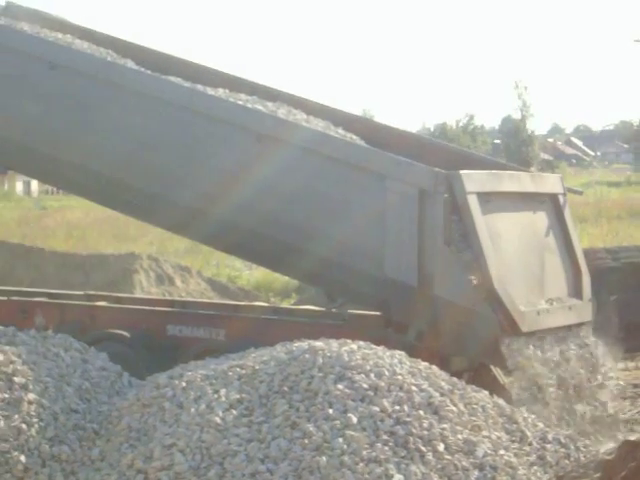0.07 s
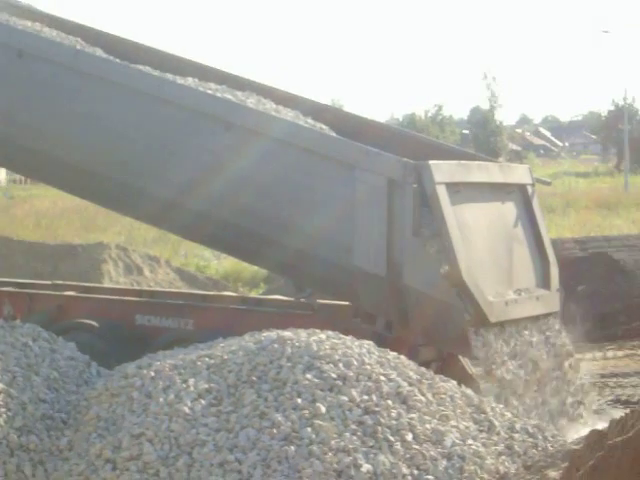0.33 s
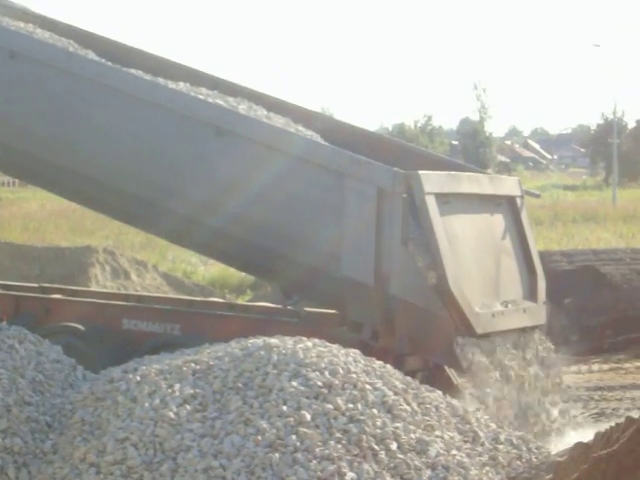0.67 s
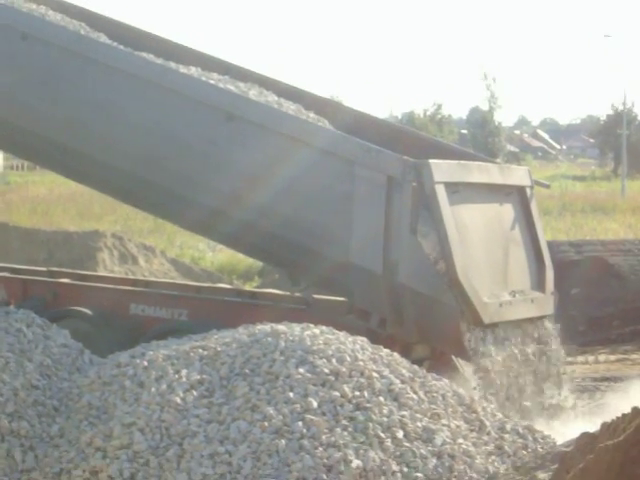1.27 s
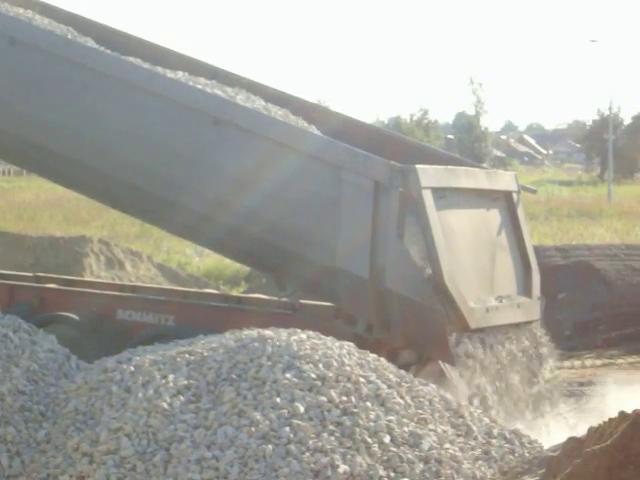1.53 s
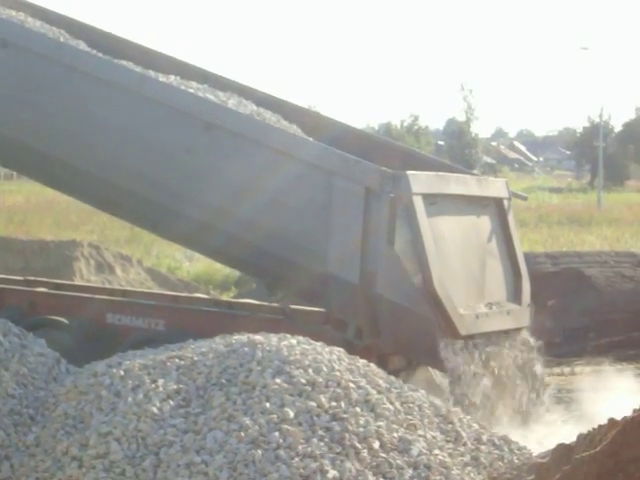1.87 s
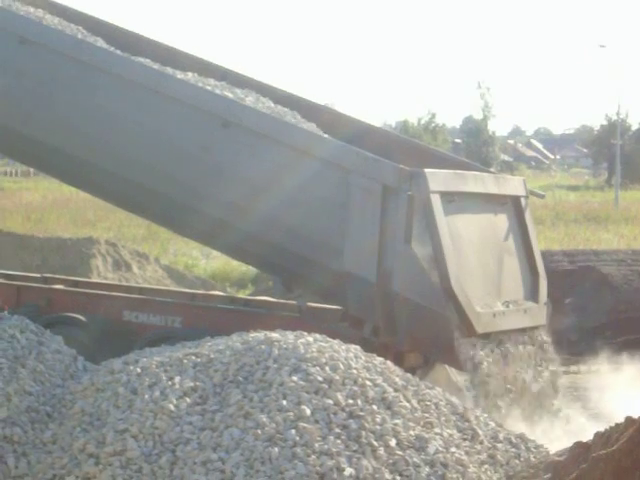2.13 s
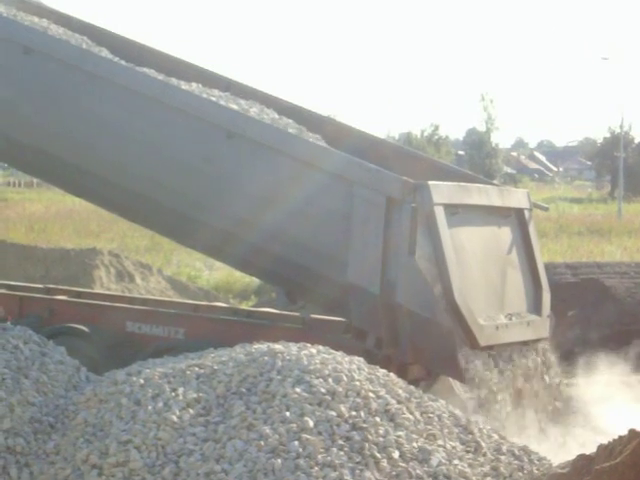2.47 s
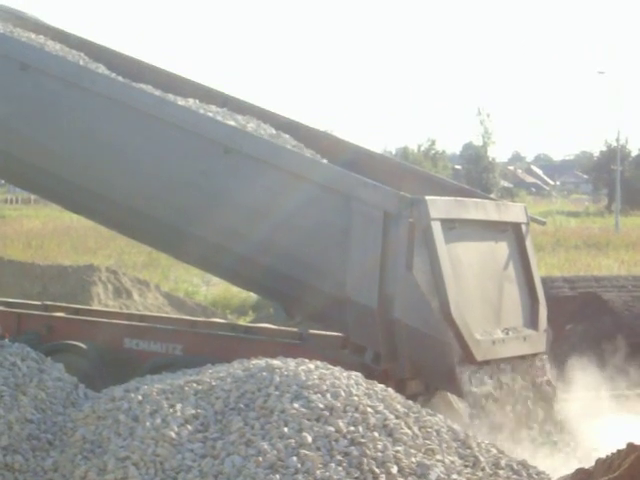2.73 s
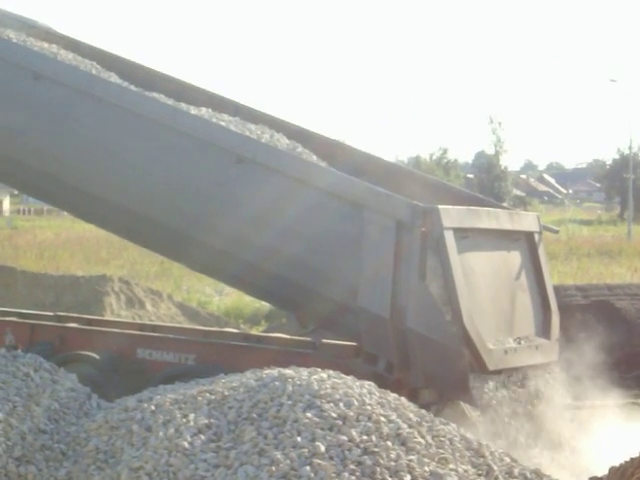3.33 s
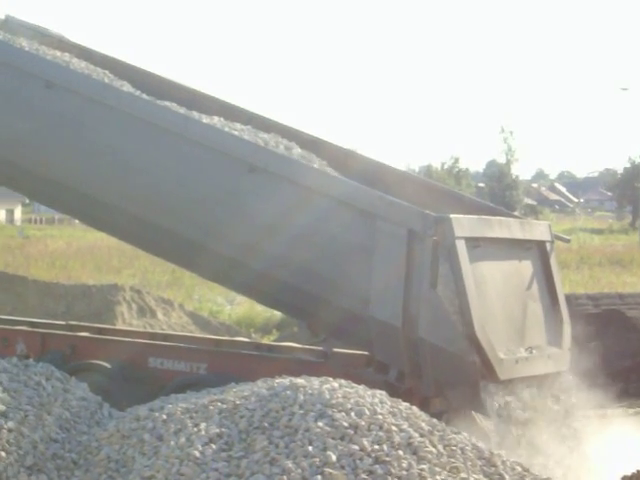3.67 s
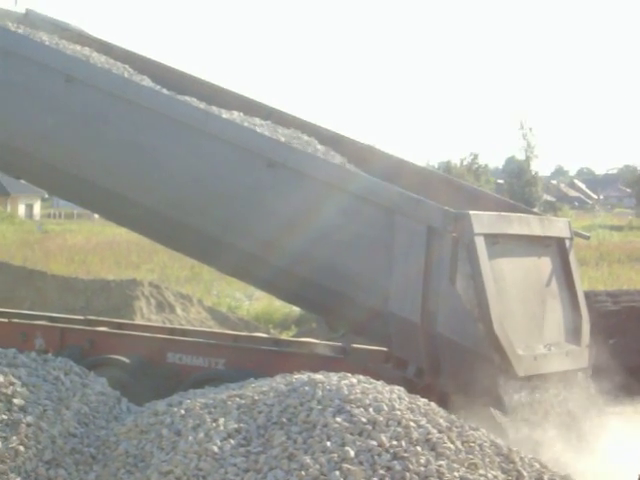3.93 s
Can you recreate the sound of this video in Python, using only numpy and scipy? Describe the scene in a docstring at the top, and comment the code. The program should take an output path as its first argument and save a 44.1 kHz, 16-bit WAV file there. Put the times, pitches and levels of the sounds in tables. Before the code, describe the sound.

Gravel pours from a tipper trailer for the whole four seconds, scraping along the metal bed and pattering onto a heap in uneven surges. Bigger stones clack sharply at about 0.4, 0.8, 1.5, 2.1 and 3.7 seconds, among a few hollow knocks. A diesel engine idles underneath with a faint, low compressor puffing. A soft gust brushes the microphone near 3.4 seconds. The open field gives no echo.

```python
"""Gravel poured from a tipper trailer

Coarse gravel slides down a metal bed, whose modes ring under the many small impacts. The stones clack
together in surges under the tailgate and patter onto a heap in an open field. An idling diesel throbs
at its firing rate, and an air compressor puffs into a resonant intake pipe. A small camera hears it
all through a narrow band, with one soft gust."""
import sys
import numpy as np
from scipy.fft import rfft, irfft, next_fast_len
from scipy.io import wavfile
from scipy.ndimage import map_coordinates

SR = 44100
rng = np.random.default_rng(int(sys.argv[2]) if len(sys.argv) > 2 else 0)


def digitize_waveform(pressure):
    """Quantize a signal to 16-bit integers and store it at the path in sys.argv[1].

    Rows of a 2-D input are taken as channels; values are limited to [-1, 1].
    """
    field = np.atleast_2d(pressure).T
    bounded = np.clip(field, -1, 1)
    quanta = np.round(bounded * 32767).astype(np.int16)
    wavfile.write(sys.argv[1], SR, quanta)


N = 176400


def amp(db):
    """Amplitude ratio of a level in decibels."""
    return 10 ** (np.asarray(db) / 20)


def unit(x):
    """Normalisation to an RMS of one."""
    return x / np.sqrt(np.mean(x ** 2) + 1e-20)


def curve(rows):
    """Linear interpolation of (time_s, value) rows, one value per sample."""
    return np.interp(np.arange(N) / SR, *np.transpose(rows))


def wobble(knots_per_s):
    """Smooth random modulation: a spline through Gaussian values."""
    knots = rng.standard_normal(int(N * knots_per_s / SR) + 4)
    return map_coordinates(knots, [np.arange(N) * knots_per_s / SR])


def filtered(x, response):
    """Linear filtering: the spectrum is multiplied by a frequency response."""
    size = next_fast_len(N + SR // 2)
    hz = np.fft.rfftfreq(size, 1 / SR)
    return irfft(rfft(x, size) * response(hz), size)[:N]


def coloured(x, points):
    """Spectral shaping by (frequency_hz, gain_db) points on a log axis."""
    hz, db = np.transpose(points)
    return filtered(x, lambda f: amp(np.interp(np.log(f + 1), np.log(hz), db)))


def ringing(x, modes):
    """Modal superposition: x drives damped resonators in parallel."""
    return filtered(x, lambda f: sum(amp(db) * 1j * f * width / (hz * hz - f * f + 1j * f * width)
                                     for hz, width, db in modes))


def impacts(per_s, spread_db):
    """A Poisson process: independent stone contacts of unequal force."""
    hits = rng.random(N) < per_s / SR
    force = amp(spread_db * np.clip(rng.standard_normal(N), -2, 2))
    return hits * rng.choice([-1, 1], N) * force


def gust(level_db=-23, at_s=3.41, width_s=.07):
    """Low noise swells once under a Gaussian envelope, as of a breeze on the microphone."""
    # buffeting spectrum: frequency_hz, gain_db
    spectrum = [(25, -10.5), (70, 0.5), (130, -0.5), (250, -13.5), (700, -55)]
    swell = np.exp(-((np.arange(N) / SR - at_s) / width_s) ** 2)
    return amp(level_db) * swell * unit(coloured(rng.standard_normal(N), spectrum))


def diesel(firing_hz=27.965, first_firing_s=.005, cylinders=6, jitter=.013, uneven_db=.6,
           rumble_db=-28.5, rumble_fade_db_per_s=.5):
    """Periodic firing gives exhaust harmonics, modulated once per engine cycle, over chassis rumble."""
    # exhaust harmonics: firing_multiple, gain_db, swing_db, fade_db_per_s
    orders = [(1, 0.5, 0.1, 0), (2, -8.5, 2, 1.16), (4, -19, 1, .3)]
    # strength of the exhaust throb: time_s, level_db
    throb_levels = [(0.05, -15.5), (0.61, -17), (0.65, -15.5), (1.68, -14.5), (1.8, -21), (2.0, -16),
                    (2.97, -19), (3.32, -15.5), (3.73, -19), (3.95, -17)]
    # chassis rumble: frequency_hz, gain_db
    spectrum = [(8, -32.5), (20, -3.5), (33, -3.5), (45, -1), (70, 1), (100, -9), (200, -2.5), (400, -27.5),
                (1500, -63)]
    t = np.arange(N) / SR
    from_middle_s = t - t.mean()
    firings = firing_hz * (t - first_firing_s) + jitter * wobble(12)
    lope = np.cos(2 * np.pi * firings / cylinders)
    throb = np.zeros(N)
    for multiple, db, swing, fade in orders:
        rms = amp(db - swing * lope - fade * from_middle_s + uneven_db * wobble(25))
        throb += np.sqrt(2) * rms * np.cos(2 * np.pi * multiple * firings)
    rumble = unit(coloured(rng.standard_normal(N), spectrum))
    rumble *= amp(rumble_db - rumble_fade_db_per_s * from_middle_s)
    return amp(curve(throb_levels)) * throb + rumble


def compressor(turn_hz=12.61, level_db=-31, scatter_db=1.55, fade_db_per_s=.5):
    """A slowly fading train of air pulses excites the resonances of the intake pipe."""
    # puffs in one turn, the first two a double flap of the valve: turn_fraction, gain_db
    strokes = [(0.144, 2), (.225, -3), (.605, -8)]
    # intake pipe resonances: frequency_hz, bandwidth_hz, gain_db
    modes = [(65, 16, 4.5), (164.4, 55, 7.5), (205, 30, -4.5), (255, 40, -11)]
    puffs = np.zeros(N + SR)
    turns = np.arange(int(N / SR * turn_hz) + 1)
    for fraction, db in strokes:
        times_s = (turns + fraction) / turn_hz
        puff_db = db - fade_db_per_s * times_s + scatter_db * rng.standard_normal(len(turns))
        puffs[np.round(times_s * SR).astype(int)] = amp(puff_db)
    muffled = coloured(ringing(puffs[:N], modes), [(270, 10), (400, -24), (1000, -46.5)])
    return amp(level_db) * unit(muffled)


def heap(patter_db=3, flutter_db=1.24):
    """Brief contacts carry high frequencies: stones tick sharply as they land."""
    # stones landing on the heap: time_s, level_db
    landing_levels = [(0.0, -28), (0.03, -29.5), (0.42, -24), (0.43, -27.5), (1.76, -25.5), (1.79, -30),
                      (1.97, -24), (2.38, -25.5), (2.57, -23.5), (3.14, -25.5), (3.48, -22.5), (3.77, -28),
                      (3.98, -24.5), (4.0, -26.5)]
    # patter spectrum: frequency_hz, gain_db
    spectrum = [(1500, -34.5), (3000, 1.5), (3800, 0.5), (4300, 0), (5000, 1), (5500, -1), (6000, 0.5),
                (7000, -15)]
    ticks = unit(coloured(impacts(per_s=5000, spread_db=5), spectrum))
    return amp(curve(landing_levels) + patter_db + flutter_db * wobble(45)) * ticks


def knocks(relative_bandwidth=.16, width_s=.024):
    """Damped resonance: tumbling heavy stones knock hollowly at the pitch of the spot they hit."""
    # tumbles on the bed: centre_s, level_db, pitch_hz
    tumbles = [(.68, -27, 610), (.848, -21.5, 1000), (1.39, -27, 660), (1.62, -24, 620), (2.6, -29, 600),
               (3.63, -25, 2080)]
    t, out = np.arange(N) / SR, np.zeros(N)
    for centre_s, db, hz in tumbles:
        mode = [(hz, relative_bandwidth * hz, 0)]
        envelope = amp(db) * np.exp(-((t - centre_s) / width_s) ** 2)
        contacts = impacts(per_s=1500, spread_db=2)
        out += envelope * unit(ringing(ringing(contacts, mode), mode))
    return out


def bed(scrape_db=-1.5, ring_db=-3.5, flutter_db=.8):
    """Forced vibration: the sliding load scrapes the metal bed and drives its modes."""
    # the load sliding: time_s, level_db
    slide_levels = [(0.0, -18), (0.5, -21), (0.97, -18), (0.99, -21), (1.44, -18), (1.75, -19), (1.83, -20),
                    (3.54, -20.5), (3.59, -26), (3.63, -18), (3.82, -22), (4.0, -20.5)]
    # scraping spectrum: frequency_hz, gain_db
    spectrum = [(40, -4), (150, -5.5), (310, -10.5), (500, 1), (650, -4.5), (900, 2.5), (1300, -0.5),
                (2000, -1.5), (2400, -3), (3200, -2.5), (4500, -38.5)]
    # bed resonances: frequency_hz, bandwidth_hz, gain_db
    modes = [(385, 24, -4), (484, 18, -1.5), (540, 40, -6.5), (700, 20, -4), (732, 20, 0), (810, 40, -6),
             (897, 28, 0), (1037, 24, 2), (1160, 50, -4), (1292, 36, -.7), (1441, 34, -4), (1542, 18, 0),
             (1745, 18, -1), (1820, 40, -4), (2350, 60, -4)]
    # one panel sings as the load thins: time_s, level_db
    panel_levels = [(0, -32), (1.9, -36), (2.45, -29), (3.1, -34), (3.7, -29.5), (4, -46)]
    # panel resonance: frequency_hz, bandwidth_hz, gain_db
    panel_mode = [(1211, 16, 0)]
    scrape = amp(scrape_db) * unit(coloured(impacts(per_s=7000, spread_db=4.5), spectrum))
    ring = amp(ring_db) * unit(ringing(impacts(per_s=2500, spread_db=3.5), modes))
    panel_hits = impacts(per_s=770, spread_db=3)
    panel = unit(ringing(ringing(panel_hits, panel_mode), panel_mode))
    slide = amp(curve(slide_levels) + flutter_db * wobble(35))
    return slide * (scrape + ring) + amp(curve(panel_levels)) * panel


def tailgate_stream(clack_db=-2, ring_db=-4, flutter_db=1.31):
    """Granular flow: stones crowd under the tailgate and collide in clumps."""
    # surges of stones: time_s, level_db
    surge_levels = [(0.0, -15), (0.69, -16.6), (0.73, -13.5), (0.81, -17.5), (0.85, -16), (0.91, -19),
                    (1.02, -13), (1.07, -21.5), (1.18, -13), (1.23, -17), (1.41, -16), (1.46, -19.5),
                    (1.49, -16.5), (1.61, -16.5), (1.75, -14.5), (1.8, -19), (1.86, -13.5), (2.03, -17.9),
                    (2.26, -15.5), (2.34, -20), (2.42, -15.5), (2.58, -19), (2.88, -14.5), (2.97, -20),
                    (3.15, -12), (3.2, -19), (3.44, -14.5), (3.57, -20), (3.63, -14.5), (3.66, -19.5),
                    (3.7, -15), (3.77, -17), (3.79, -14.5), (3.88, -18.5), (3.95, -13.5), (3.99, -18)]
    # clack spectrum: frequency_hz, gain_db
    spectrum = [(1200, -41.5), (2100, -11), (2420, -16), (2650, 0), (2900, 0.5), (3150, -2), (3600, -6),
                (4100, -15), (5500, -43.5)]
    # resonances the clacks excite: frequency_hz, bandwidth_hz, gain_db
    modes = [(2640, 42, -1.5), (2802, 50, 0), (2922, 60, -1.5)]
    clacks = amp(clack_db) * unit(coloured(impacts(per_s=3200, spread_db=1.5), spectrum))
    ring = amp(ring_db) * unit(ringing(impacts(per_s=1500, spread_db=3), modes))
    return amp(curve(surge_levels) + flutter_db * wobble(40)) * (clacks + ring)


def big_stones(level_db=-5, attack_s=.00042, ring_t60_s=.012, crack_db=-7, crack_t60_s=.006):
    """Free decay after impact: each big stone cracks and rings for a few milliseconds."""
    # single strikes: start_s, gain_db, pitch_hz
    strikes = [(0.1196, -1, 2960), (0.4254, 7.5, 2820), (0.5785, -4, 2800), (0.7812, 5, 2860),
               (1.2885, -5, 2930), (1.484, 5.5, 3000), (1.488, 4.5, 2740), (1.566, -13, 2750),
               (1.8547, -2, 2790), (2.1188, 5, 2920), (2.6943, -5, 2800), (3.6895, 4, 2760),
               (3.785, -4, 2740), (3.9325, 0, 2950)]
    t, out = np.arange(SR // 20) / SR, np.zeros(N + SR)
    attack = 1 - np.exp(-t / attack_s)
    for start_s, db, hz in strikes:
        ring = np.sin(2 * np.pi * hz * t) * amp(-60 * t / ring_t60_s)
        crack = rng.standard_normal(len(t)) * amp(crack_db - 60 * t / crack_t60_s)
        out[round(start_s * SR):][:len(t)] += amp(db + level_db) * (ring + crack) * attack
    return out[:N]


def scene():
    """Superposition in a free field: gravel and truck add without echoes."""
    gravel = bed() + tailgate_stream() + heap() + big_stones() + knocks()
    return (gravel + diesel() + compressor() + gust())[None]


def record(dry):
    """Soft saturation and band limiting: the camera rounds the highest peaks and cuts the treble."""
    # camera roll-off: frequency_hz, gain_db
    roll_off = [(5400, -0.5), (6000, -10), (6400, -14.5), (6750, -20), (7050, -35), (7300, -64.5)]
    ceiling, band_limit_hz = .84, 7250
    rounded = dry[0] / (1 + (dry[0] / ceiling) ** 10) ** (1 / 10)
    return filtered(coloured(rounded, roll_off), lambda hz: hz < band_limit_hz)[None]


dry = scene()
out = record(dry)
digitize_waveform(out)
```